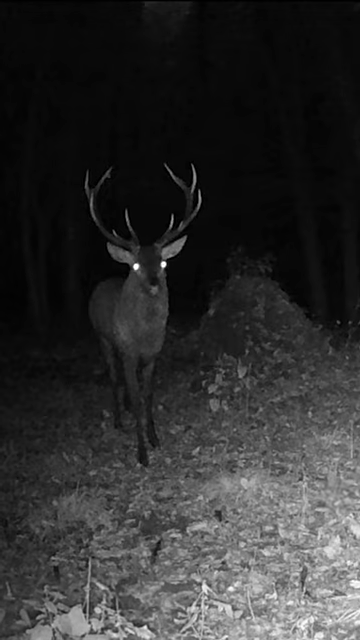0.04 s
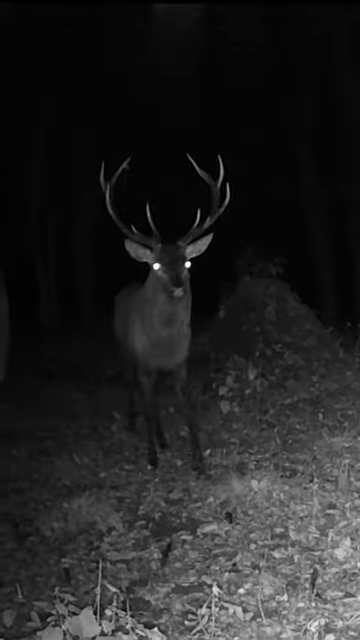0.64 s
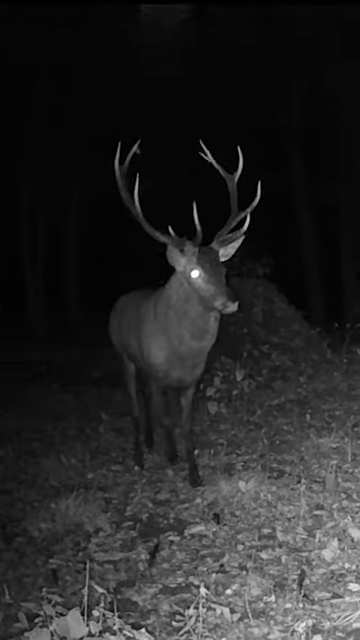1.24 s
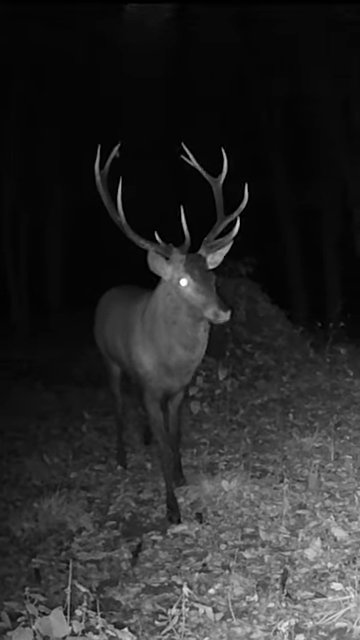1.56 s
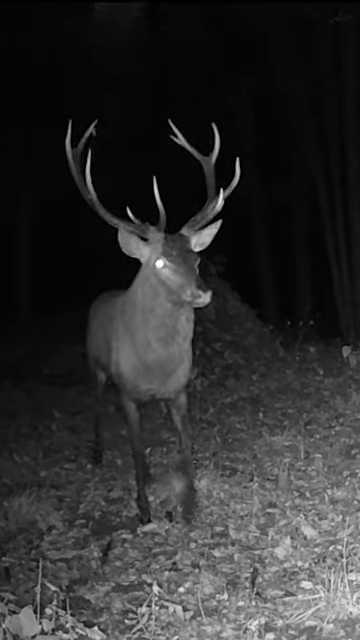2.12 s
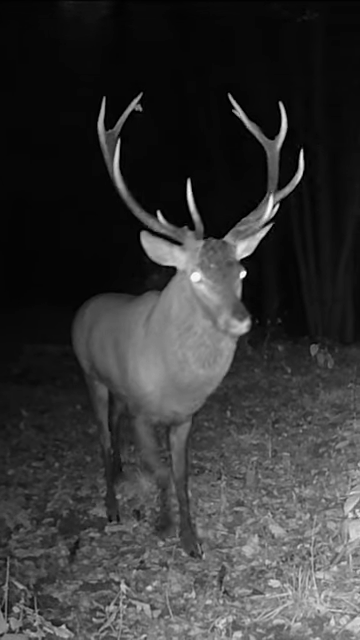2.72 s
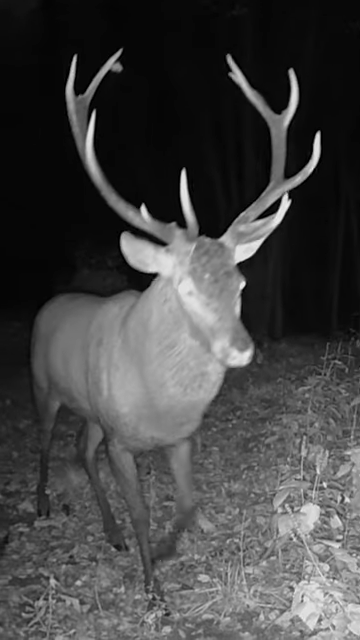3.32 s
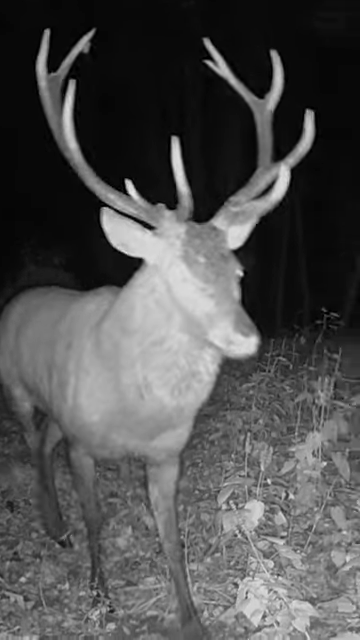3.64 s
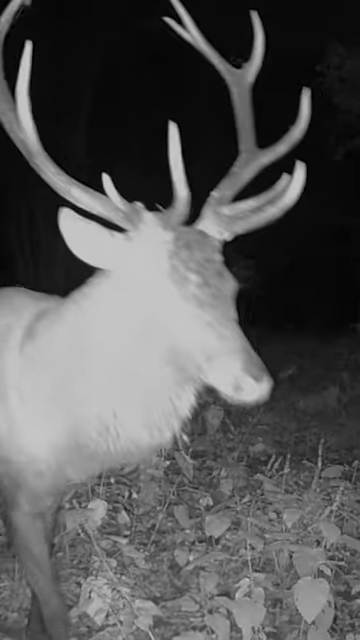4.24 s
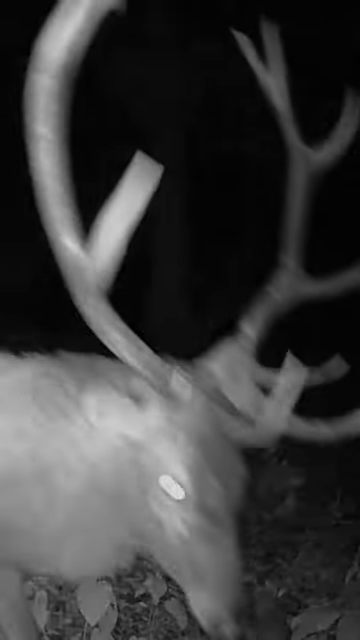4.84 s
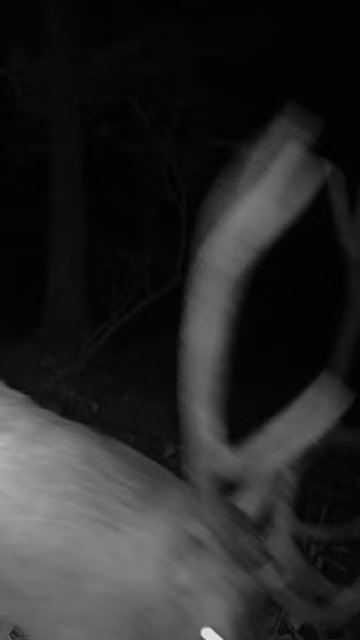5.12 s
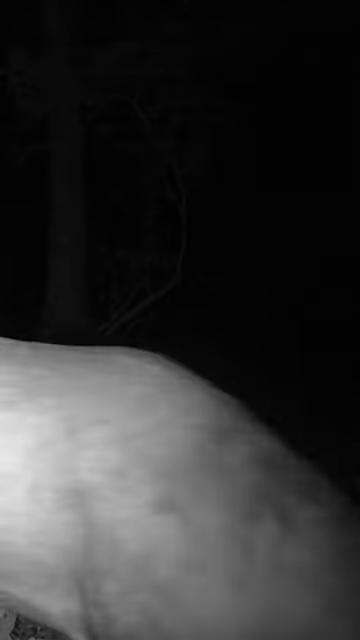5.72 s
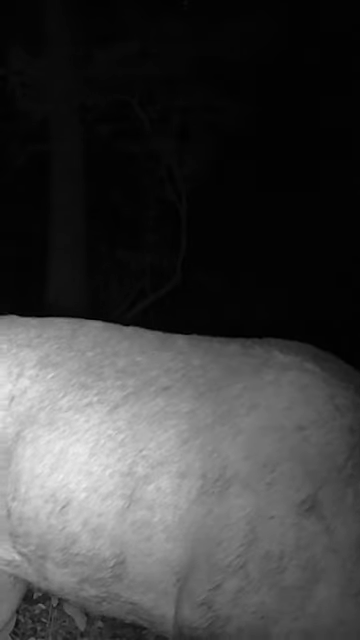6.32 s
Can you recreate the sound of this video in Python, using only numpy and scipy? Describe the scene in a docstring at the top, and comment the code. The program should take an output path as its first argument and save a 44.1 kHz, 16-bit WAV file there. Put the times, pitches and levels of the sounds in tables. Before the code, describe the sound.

Slow, heavy steps of a deer crush leaf litter and crack twigs as it passes close by, above a low rumble and dull hiss.

```python
"""A stag walks up through dry leaf litter at night and passes close by; the treble is dull throughout.
A low rumble, a hiss and faint rustles come first. From 0.2 s hooves crush leaves, thud on soft soil
and snap twigs. From 1.5 s the stag nears: the rumble swells, a faint hollow drone joins, legs drag
through the leaves and a hoof gives a few dull knocks. From 3.6 s the opening steps repeat.
From 5 s come more drags, thuds and snaps."""
import sys
import numpy as np
from scipy import signal
from scipy.io import wavfile
from scipy.ndimage import uniform_filter1d

SR = 44100
rng = np.random.default_rng(int(sys.argv[2]) if len(sys.argv) > 2 else 0)


def wav_out(sig):
    """Save sig, one row per channel (or a flat mono array), as 16-bit PCM at SR to the path in sys.argv[1]."""
    wavfile.write(sys.argv[1], SR, np.round(np.clip(np.atleast_2d(sig).T, -1, 1) * 32767).astype(np.int16))


N = 289296
TIME_S = np.arange(N) / SR

# noise spectra: freq_hz, relative_db
RUMBLE_SPECTRUM = [(24, -27), (41, 2), (53, -2.5), (65, 9), (75, -3), (91, 0.5), (118, -4.5), (152, -12.5),
                   (205, -30), (330, -32)]
DEEP_SPECTRUM = [(6, -7.5), (16, -15), (27, 8.5), (35, -1.5), (52, -25)]
HISS_SPECTRUM = [(62, -11.5), (165, 1.5), (320, 0.5), (455, -2.5), (610, -3), (770, -7), (1120, -8.5),
                 (1620, -17.5), (2050, -22), (3150, -27.5), (5100, -35.5)]
FIZZ_SPECTRUM = [(820, -2.5), (1580, 9.5), (2150, -4), (3250, -6.5), (5150, -16), (6400, -33.5),
                 (8400, -57), (11200, -64.5)]
SNAP_SPECTRUM = [(210, -18.5), (720, 9), (1660, -2), (2020, -6), (3150, -6.5), (5150, -14.5), (6350, -28.5),
                 (8100, -37.5), (11200, -60)]
CRUNCH_SPECTRUM = [(150, -18.5), (400, 1), (800, 0), (1300, 3), (1680, 2.5), (1900, -6.5), (2400, -6.5),
                   (3200, -40), (6000, -108)]
CRACKLE_SPECTRUM = [(920, -22), (1880, 3.5), (2450, 4.5), (3150, 2.5), (4100, -1), (5250, -7),
                    (6350, -16.5), (7400, -25), (8600, -34), (11200, -48)]
# hooves set down in the litter: start_s, rise_s, hold_s, level_db, crackle_relative_db, hollow_hz
HOOF_STEPS = [ (0.208, 0.019, 0.022, -35.5, -11, 1400), (0.505, 0.019, 0.051, -35, -6, 1500),
              (0.827, 0.0061, 0.093, -37.5, -6, 1540), (1.249, 0.0037, 0.006, -40, -2.5, 1450),
              (2.326, 0.024, 0.049, -31, -9, 1610), (2.962, 0.029, 0.056, -31, -10, 1490),
              (3.32, 0.016, 0.062, -36, -12.5, 1900), ]
# weight landing on soil: start_s, level_db, pitch_hz, length_s
SOIL_THUDS = [(0.256, -22, 65.6, 0.085), (0.58, -21, 81.5, 0.06), (0.707, -21, 65, 0.048),
              (0.907, -20, 72.6, 0.043), (1.317, -22.5, 62.5, 0.051), (2.14, -23, 67, 0.081),
              (3.108, -28, 83, 0.06), (3.459, -23, 62.4, 0.066), (5.19, -29, 126, 0.048),
              (5.355, -23.5, 60, 0.043), (5.629, -30.5, 72, 0.058), (5.858, -20.5, 60, 0.036),
              (6.302, -30, 68.5, 0.046)]
# twigs and stalks breaking: start_s, level_db, pitch_hz, length_s, splinter_relative_db
TWIG_SNAPS = [ (0.481, -32.5, 1480, 0.023, -9), (0.526, -26.5, 1330, 0.009, -8),
              (0.834, -27.5, 1650, 0.013, -11), (0.841, -26, 1600, 0.012, -1),
              (0.866, -33.5, 990, 0.019, -5), (0.938, -36, 1530, 0.014, -0.5),
              (1.247, -37.5, 1810, 0.018, 0.5), (1.572, -40.5, 1370, 0.017, 2),
              (1.948, -34, 3130, 0.0068, -10), (2.319, -38.5, 2180, 0.013, -18),
              (2.496, -35, 1310, 0.011, -23), (2.543, -38, 2900, 0.0029, -2),
              (2.658, -40.5, 3000, 0.034, 3.5), (2.965, -35.5, 1530, 0.017, -2.5),
              (2.982, -25, 1050, 0.0086, -1), (3.045, -28.5, 940, 0.023, -12),
              (3.169, -44, 3950, 0.0032, 1), (3.246, -45, 2860, 0.0057, 7.5),
              (3.31, -32.5, 3060, 0.0047, 5.5), (3.337, -32.5, 1760, 0.008, 3.5),
              (5.126, -33.5, 934, 0.013, -11), (5.384, -36, 2190, 0.004, -4),
              (5.504, -38.5, 1840, 0.041, -7), (5.746, -37, 1870, 0.01, -15),
              (5.927, -32, 1580, 0.0085, -16), (6.11, -41, 2230, 0.021, 3), (6.209, -38, 2810, 0.005, 1),
              (6.27, -40.5, 4130, 0.0032, 9.5), (6.383, -32.5, 1820, 0.011, -9), ]
# resonances of the drone: pitch_hz, width_hz, relative_db
DRONE_RESONANCES = [(192, 120, 10), (319, 64, 10), (668, 67, 26), (960, 160, -4)]
# legs dragged through leaves: start_s, length_s, level_db, crackle_relative_db, hollow_hz
LEG_DRAGS = [ (1.55, 0.6, -34.5, -14.5, 1180), (1.645, 0.14, -39, -8.5, 1550),
             (1.94, 0.22, -35.5, -12, 1580), (2.645, 0.16, -36.5, -12, 1340),
             (5.05, 0.34, -44.5, -16.5, 1050), (5.395, 0.14, -40, -10, 1800),
             (5.465, 0.087, -44.5, -2.5, 1220), (5.735, 0.14, -40, -18.5, 1600),
             (6.06, 0.59, -47, -7.5, 1880), ]
# hoof knocks: start_s, level_db
HOOF_KNOCKS = [(1.741, -6), (1.8408, -16.5), (1.9155, -10), (3.142, -29)]
# resonances of a knock: pitch_hz, relative_db, t60_s
KNOCK_RESONANCES = [(242, 4.5, 0.0067), (622, -4.5, 0.032), (960, -3.5, 0.0084), (1330, 0, 0.0088),
                    (1610, -4.5, 0.0076), (3030, -16, 0.0086)]


def gain_of(db):
    """Decibels to amplitude."""
    return 10 ** (np.asarray(db) / 20)


def unit_rms(x):
    """Scales to rms 1."""
    return x / np.sqrt(np.mean(x ** 2) + 1e-20)


def steady(x, window_s):
    """Holds the running rms at 1; fine grain stays."""
    return x / np.sqrt(abs(uniform_filter1d(x ** 2, int(window_s * SR))) + 1e-12)


def add(mix, start_s, sound):
    """Mixes a sound in, cut at the end of the mix."""
    part = mix[round(start_s * SR):][:len(sound)]
    part += sound[:len(part)]


def colour(x, spectrum, size=2048):
    """Minimum-phase filter of unit energy; falls 36 dB per octave above the spectrum's last point."""
    hz, db = np.transpose(spectrum)
    bin_hz = abs(np.fft.fftfreq(size, 1 / SR)) + 1
    curve_db = np.interp(np.log(bin_hz), np.log(hz), db - db.max())
    curve_db -= 36 * np.log2(np.maximum(bin_hz / hz[-1], 1))
    log_gain = np.log(gain_of(np.maximum(curve_db, -110)))
    taps = np.fft.ifft(np.exp(np.conj(signal.hilbert(log_gain)))).real
    taps *= np.cos(np.pi / 2 * np.arange(size) / size)
    return signal.fftconvolve(x, taps / np.linalg.norm(taps))[:len(x)]


def resonate(x, pitch_hz, width_hz):
    """One resonance of peak gain 1."""
    return signal.lfilter(*signal.iirpeak(pitch_hz, pitch_hz / width_hz, fs=SR), x)


def patchy(x, depth_db, patch_hz, patch_s, size=1024):
    """Random gain over patches of pitch and time: a shifting grain of colour."""
    hop = size // 4
    bins = signal.stft(x, nperseg=size, noverlap=size - hop)[2]
    field = rng.standard_normal(bins.shape)
    for axis, width in enumerate([patch_hz * size / SR, patch_s * SR / hop]):
        blur = np.expand_dims(signal.windows.gaussian(31, width / 2), 1 - axis)
        field = signal.fftconvolve(field, blur, "same")
    bins *= gain_of(depth_db * np.clip(unit_rms(field), -2, 2))
    return unit_rms(signal.istft(bins, nperseg=size, noverlap=size - hop)[1][:N])


def clicks(per_s, spread_db):
    """Random clicks; a few stand out, louder for a positive spread, softer for a negative one."""
    strength = gain_of(spread_db * np.minimum(rng.exponential(1, N), 3.5))
    return strength * rng.choice([-1, 1], N) * (rng.random(N) < per_s / SR)


def nearness(start_s=1.533, end_s=3.67, rise_s=0.11, fall_s=0.62):
    """The stag's approach, 0 to 1: rises, holds, falls."""
    return np.clip(np.minimum((TIME_S - start_s) / rise_s, (end_s - TIME_S) / fall_s), 0, 1)


def wobble(low_hz=2, high_hz=9, count=24):
    """Slow random unevenness of rms 1."""
    rates_hz = np.geomspace(low_hz, high_hz, count)
    return unit_rms(sum(np.sin(2 * np.pi * (hz * TIME_S + rng.random())) for hz in rates_hz))


def night(rumble_db=-38, rumble_swell_db=9, deep_db=-40, wobble_db=1.45,
          hiss_db=-43, hiss_swell_db=2.5, fizz_db=-58):
    """Uneven rumble over a deeper one, dull hiss, ticking fizz; rumble and hiss swell as the stag nears."""
    rumble = steady(colour(rng.standard_normal(N), RUMBLE_SPECTRUM, size=16384), window_s=0.08)
    deep = steady(colour(rng.standard_normal(N), DEEP_SPECTRUM, size=16384), window_s=0.4)
    air = patchy(rng.standard_normal(N), depth_db=1.5, patch_hz=112, patch_s=0.0085)
    hiss = unit_rms(colour(air, HISS_SPECTRUM)) * gain_of(hiss_db + hiss_swell_db * nearness())
    ticks = 0.55 * unit_rms(clicks(per_s=150, spread_db=4.5))
    fizz = unit_rms(colour(rng.standard_normal(N) + ticks, FIZZ_SPECTRUM))
    low = rumble * gain_of(rumble_db + rumble_swell_db * nearness()) + gain_of(deep_db) * deep
    return low * gain_of(wobble_db * wobble()) + hiss + gain_of(fizz_db) * fizz


def buckling_leaves(low_hz=800, high_hz=5600, count=48):
    """Dry leaves buckle; each rings briefly at its own pitch."""
    buckles = clicks(per_s=900, spread_db=4.5)
    leaf = rng.integers(0, count, N)
    rings = (resonate(buckles * (leaf == k), hz, width_hz=50 + hz / 40)
             for k, hz in enumerate(np.geomspace(low_hz, high_hz, count)))
    return unit_rms(sum(rings))


def stirring_leaves(level_db=-58, swell_db=4, t60_s=0.1, ring_db=-6, size=4000):
    """Trodden leaves spring back in small scattered rustles."""
    t = np.arange(size) / SR
    releases = abs(clicks(per_s=30, spread_db=-4))
    bursts = signal.fftconvolve(releases, gain_of(-60 * t / t60_s))[:N]
    grain = gain_of(ring_db) * steady(buckling_leaves(), window_s=0.025) + rng.standard_normal(N)
    return gain_of(level_db + swell_db * nearness()) * unit_rms(colour(bursts * grain, SNAP_SPECTRUM))


def step_pressure(rise_s, hold_s, settle_t60_s=0.3):
    """A hoof presses and holds; the leaves settle."""
    t = np.arange(0, rise_s + hold_s + settle_t60_s, 1 / SR)
    settling_s = np.maximum(t - rise_s - hold_s, 0)
    return np.minimum(t / rise_s, 1) * gain_of(-60 * settling_s / settle_t60_s)


def crushed_leaves(crunch_db=-3.5, hollow_db=3, step_shuffle_db=-4, drag_shuffle_db=-2):
    """Hooves and legs press the litter: dense crunch, finer crackle on top, dull shuffle beneath."""
    packed = unit_rms(clicks(per_s=3000, spread_db=1)) + gain_of(-2.5) * buckling_leaves()
    loose = unit_rms(clicks(per_s=8000, spread_db=3)) + gain_of(-8) * buckling_leaves()
    # each clump favours its own bands for a moment
    packed = patchy(packed, depth_db=3.8, patch_hz=130, patch_s=0.018)
    loose = patchy(loose, depth_db=3, patch_hz=170, patch_s=0.014)
    crunch = colour(packed, CRUNCH_SPECTRUM)
    crackle = steady(colour(loose, CRACKLE_SPECTRUM), window_s=0.037)
    shuffle = unit_rms(colour(rng.standard_normal(N), HISS_SPECTRUM))
    out = np.zeros(N)
    for moves, pressure_of, shuffle_db in [(HOOF_STEPS, step_pressure, step_shuffle_db),
                                           (LEG_DRAGS, drag_pressure, drag_shuffle_db)]:
        for start_s, *timing_s, level_db, crackle_db, hollow_hz in moves:
            start = round(start_s * SR)
            pressure = pressure_of(*timing_s)[:N - start]
            span = slice(start, start + len(pressure))
            hollow = gain_of(hollow_db) * resonate(crunch[span], hollow_hz, width_hz=220)
            litter = gain_of(crunch_db) * steady(crunch[span] + hollow, window_s=0.043)
            litter += gain_of(crackle_db) * crackle[span] + gain_of(shuffle_db) * shuffle[span]
            add(out, start_s, gain_of(level_db) * pressure * litter)
    return out


def soil_thuds(trim_db=-1, overtone_ratio=2.1, overtone_db=-12):
    """Soft soil gives under the weight in a few slow cycles, with a weak overtone."""
    out = np.zeros(N)
    for start_s, level_db, pitch_hz, length_s in SOIL_THUDS:
        t = np.arange(0, length_s, 1 / SR)
        phase = 2 * np.pi * pitch_hz * t
        soil = np.sin(phase) + gain_of(overtone_db) * np.sin(overtone_ratio * phase)
        add(out, start_s, gain_of(level_db + trim_db) * np.sin(np.pi * t / length_s) * soil)
    return out


def twig_snaps(trim_db=-2.5, attack_s=0.00052, tail_db=-21, tail_t60_s=0.24, size=6000):
    """A twig breaks in a quick run of fibres around its own pitch; the litter scatters a short tail."""
    out = np.zeros(N)
    t = np.arange(size) / SR
    attack = 1 - np.exp(-t / attack_s)
    tail = gain_of(tail_db - 60 * t / tail_t60_s)
    for start_s, level_db, pitch_hz, length_s, splinter_db in TWIG_SNAPS:
        fibres, splinters = rng.standard_normal((2, 2 * size))
        ring = resonate(fibres, pitch_hz, width_hz=190)
        tone = steady(colour(ring, SNAP_SPECTRUM), window_s=0.0083)
        splinters = gain_of(splinter_db) * unit_rms(colour(splinters, SNAP_SPECTRUM))
        crack = (tone + splinters)[size:]  # past the filters' build-up
        envelope = attack * (np.exp(-(t / length_s) ** 4) + tail)
        add(out, start_s, gain_of(level_db + trim_db) * envelope * crack)
    return out


def drone(level_db=-46, swell_exponent=0.21):
    """Wavering noise in a few resonances: a faint hollow drone while the stag is near."""
    air = patchy(rng.standard_normal(N), depth_db=3, patch_hz=60, patch_s=0.025)
    tone = sum(gain_of(db) * resonate(resonate(air, hz, width_hz), hz, width_hz)
               for hz, width_hz, db in DRONE_RESONANCES)
    return gain_of(level_db) * steady(tone, window_s=0.092) * nearness() ** swell_exponent


def drag_pressure(length_s, arch_exponent=0.54):
    """A leg drags through the leaves: the pressure swells and fades in one arch."""
    t = np.arange(0, length_s, 1 / SR)
    return abs(np.sin(np.pi * t / length_s)) ** arch_exponent


def hoof_knocks(trim_db=1, size=3000):
    """Hard, well damped blows, as of a hoof on dead wood."""
    out = np.zeros(N)
    t = np.arange(size) / SR
    ring = sum((-1) ** k * gain_of(db - 60 * t / t60_s) * np.sin(2 * np.pi * hz * t)
               for k, (hz, db, t60_s) in enumerate(KNOCK_RESONANCES))
    for start_s, level_db in HOOF_KNOCKS:
        add(out, start_s, gain_of(level_db + trim_db) * ring / abs(ring).max())
    return out


def scene():
    """All sources, mono."""
    stag = crushed_leaves() + twig_snaps() + stirring_leaves() + hoof_knocks() + soil_thuds()
    return (stag + night() + drone())[None]


def record(dry, repeat_from_s=0.09, repeat_to_s=1.49, repeat_after_s=3.4984,
           silence_s=0.075, fade_out_s=0.005, cutoff_hz=12000):
    """The opening repeats in place of a later stretch; silent start, short end fade, low-pass."""
    opening = uniform_filter1d(1. * ((TIME_S > repeat_from_s) & (TIME_S < repeat_to_s)), size=600)
    shift = round(repeat_after_s * SR)
    repeated = dry * (1 - np.roll(opening, shift)) + np.roll(dry * opening, shift, axis=1)
    fade_in = uniform_filter1d(1. * (TIME_S > silence_s), size=600)
    fade_out = np.minimum((TIME_S[-1] - TIME_S) / fade_out_s, 1)
    low_pass = signal.firwin(511, cutoff_hz, window=("kaiser", 9), fs=SR)
    return signal.oaconvolve(repeated * fade_in * fade_out, low_pass[None], "same")


dry = scene()
out = record(dry)
wav_out(out)
```